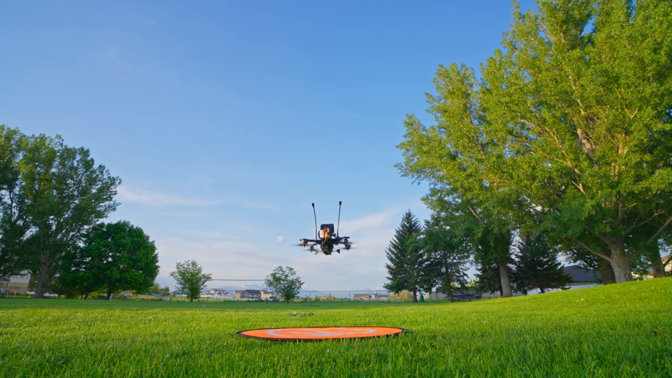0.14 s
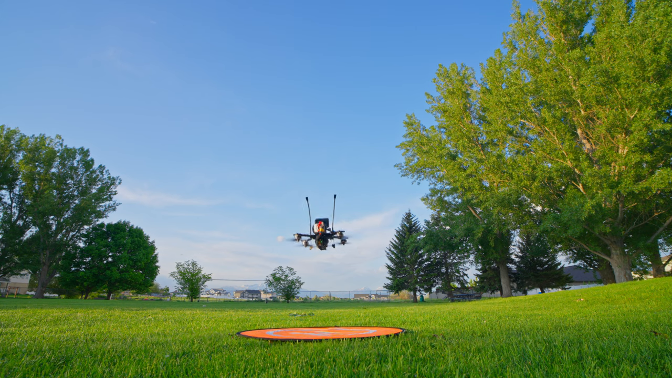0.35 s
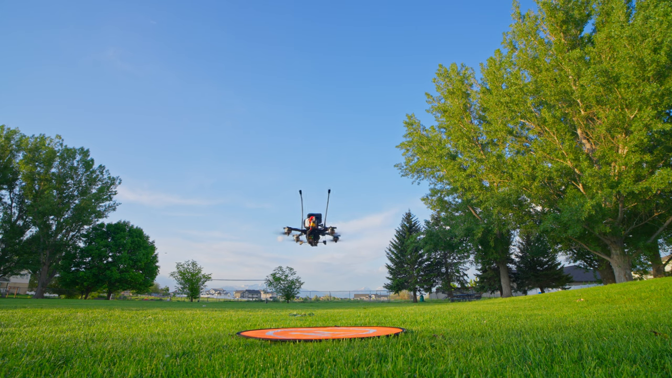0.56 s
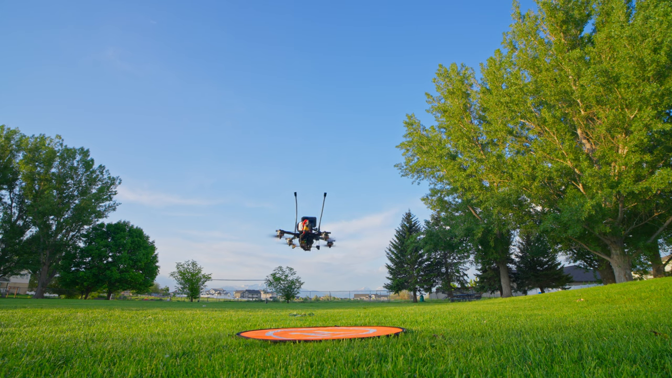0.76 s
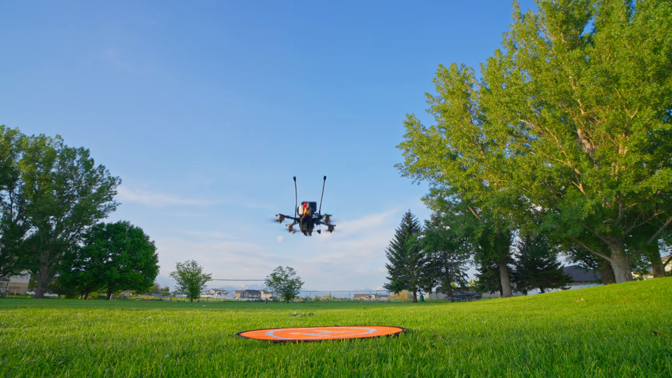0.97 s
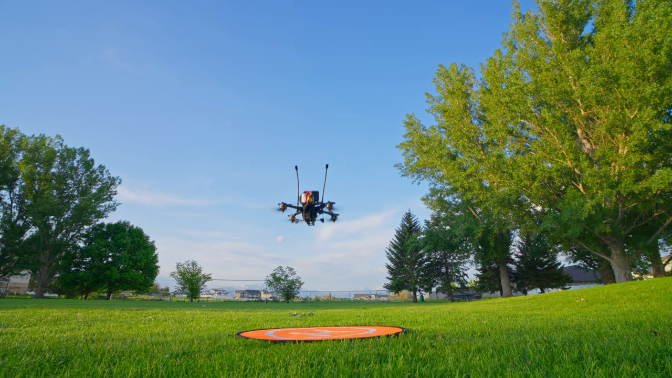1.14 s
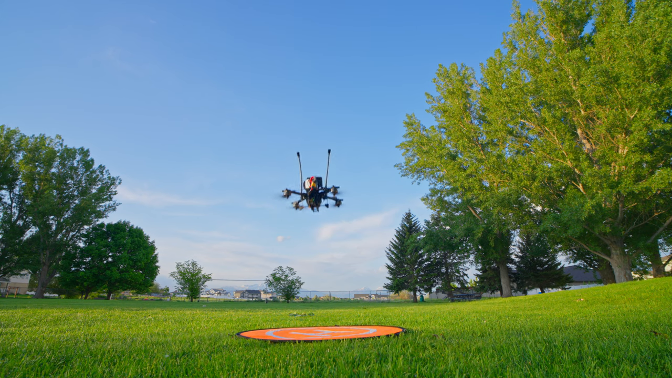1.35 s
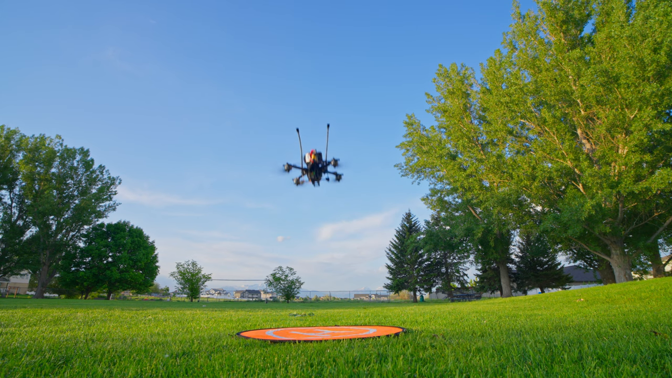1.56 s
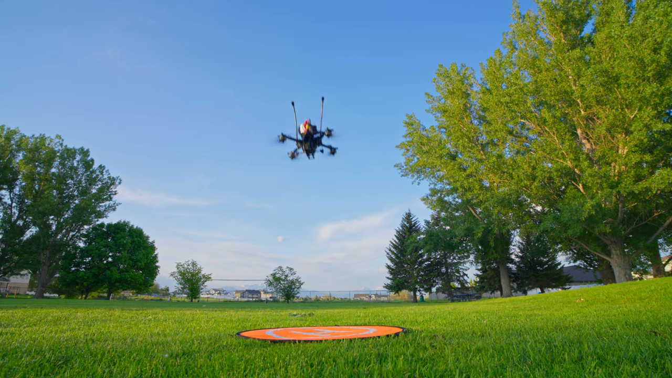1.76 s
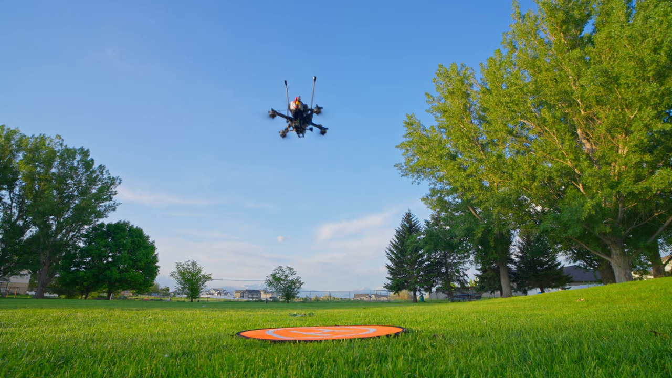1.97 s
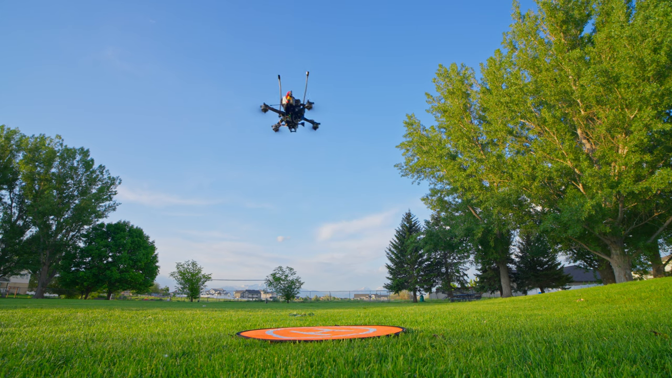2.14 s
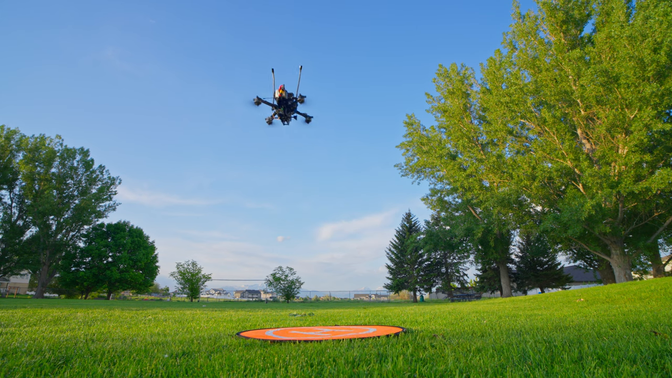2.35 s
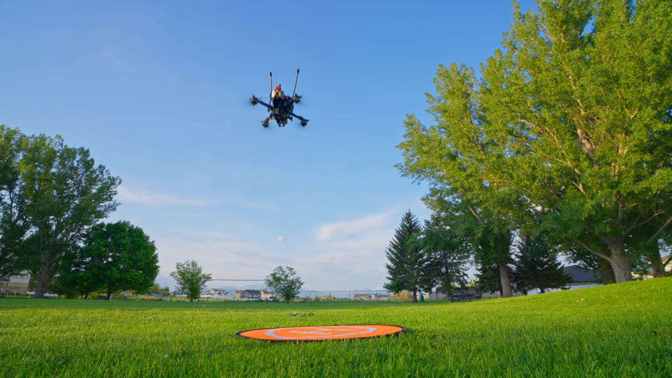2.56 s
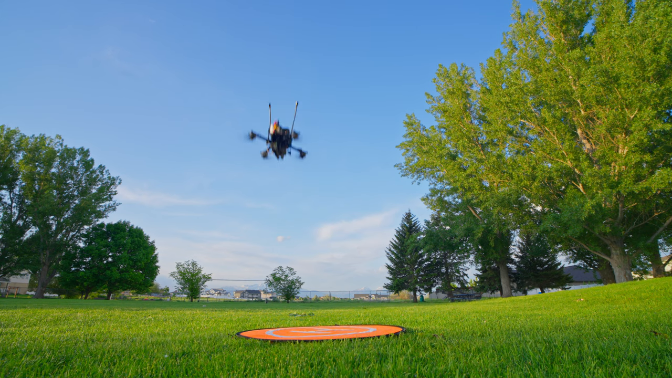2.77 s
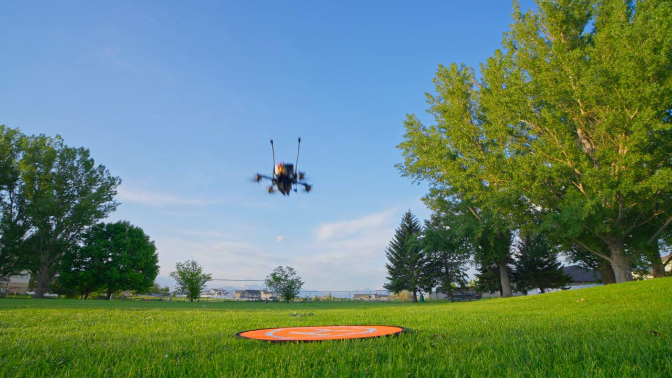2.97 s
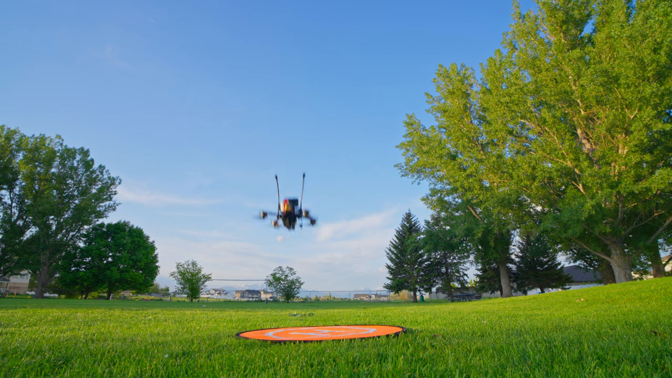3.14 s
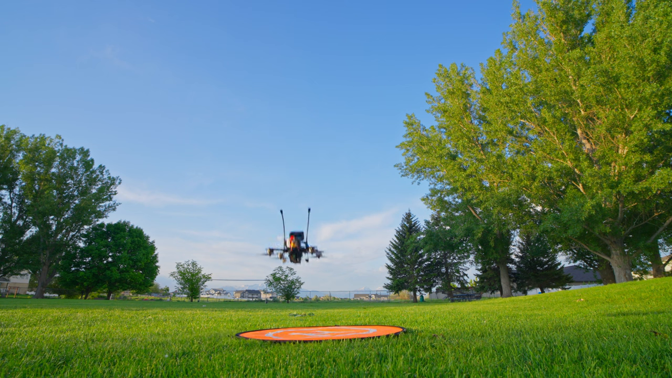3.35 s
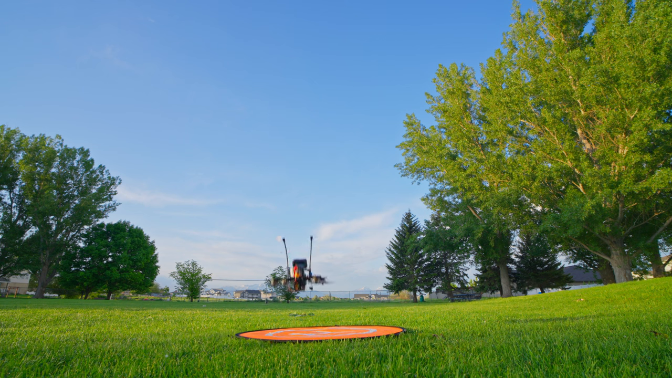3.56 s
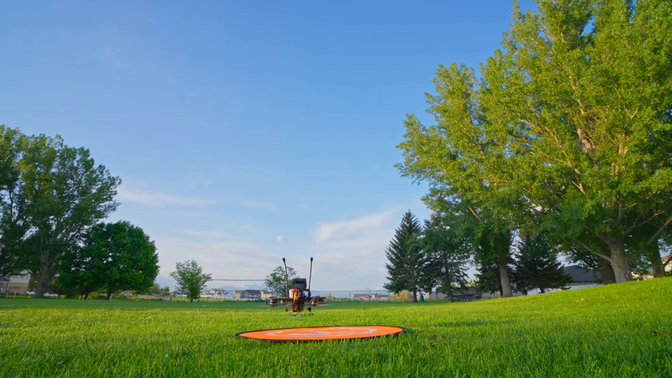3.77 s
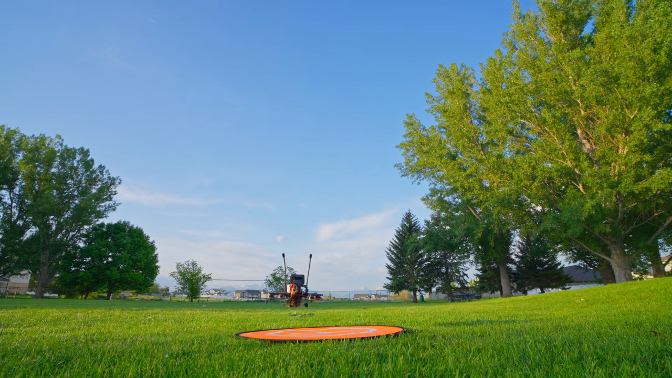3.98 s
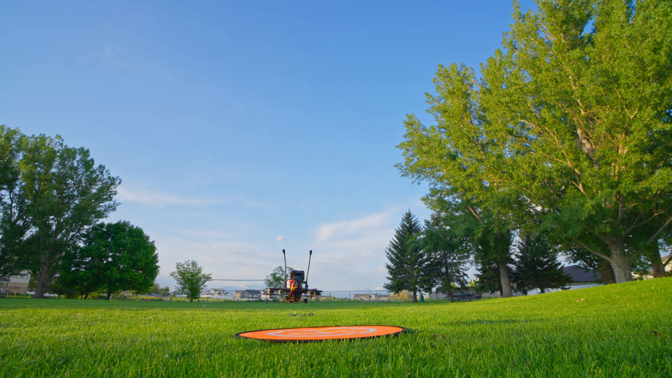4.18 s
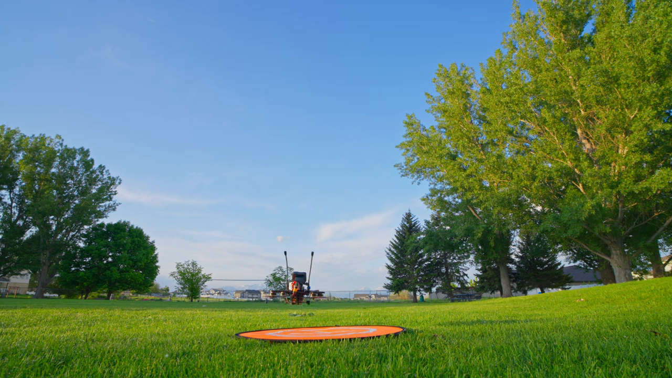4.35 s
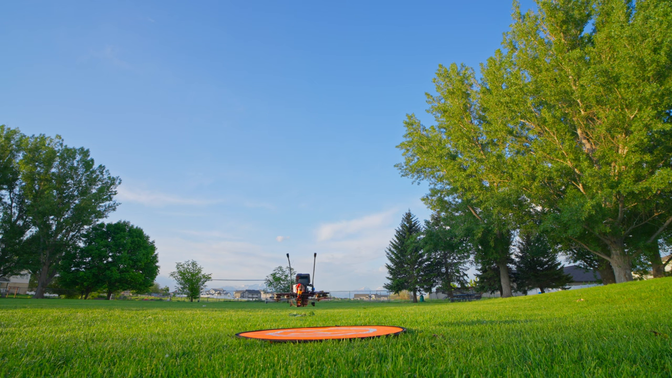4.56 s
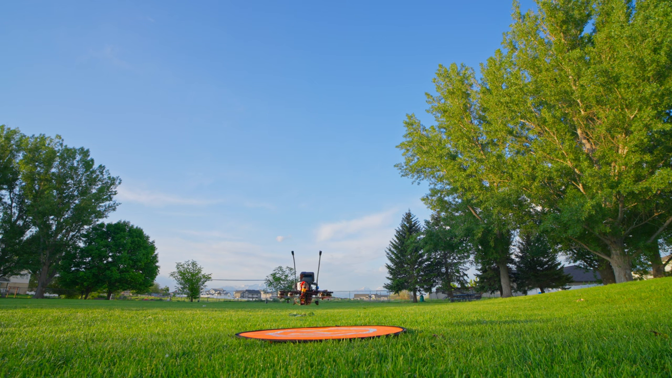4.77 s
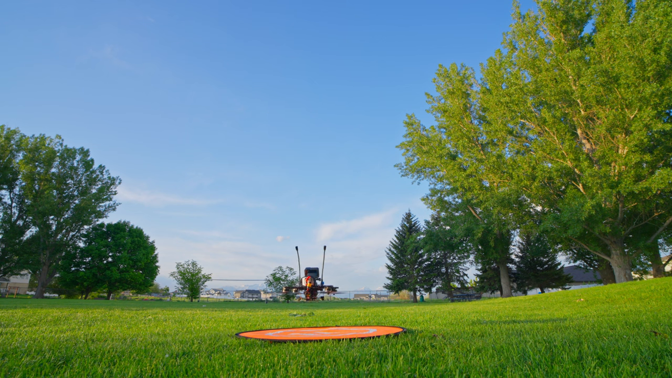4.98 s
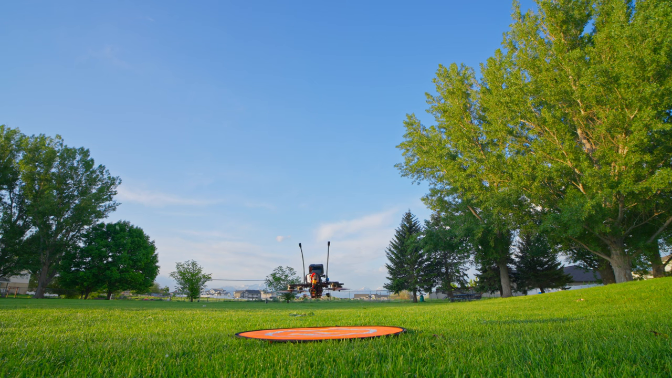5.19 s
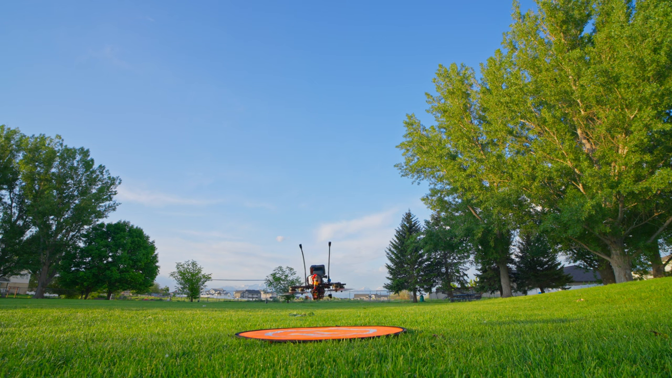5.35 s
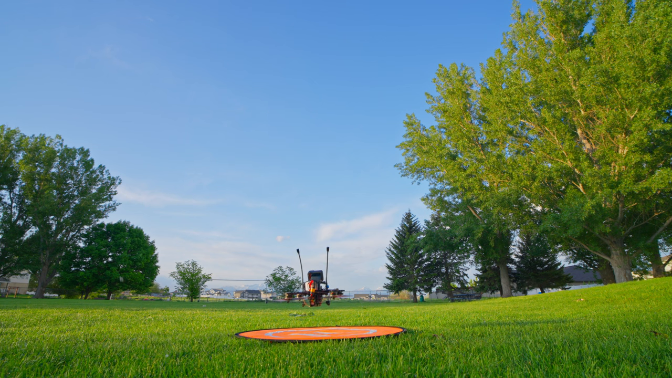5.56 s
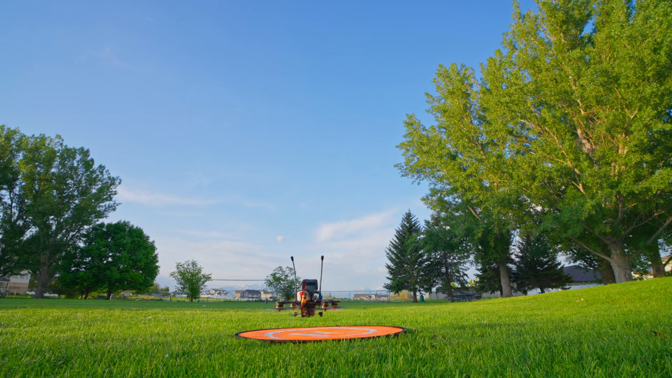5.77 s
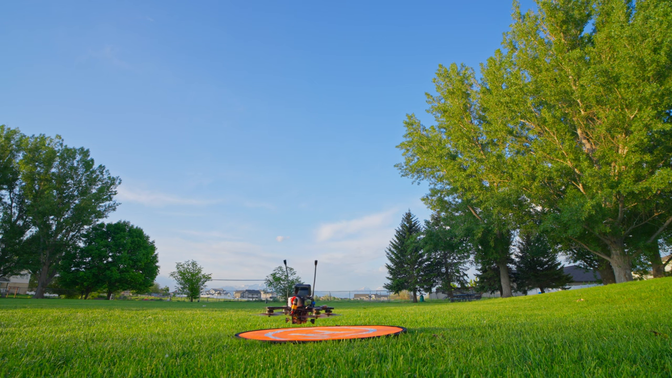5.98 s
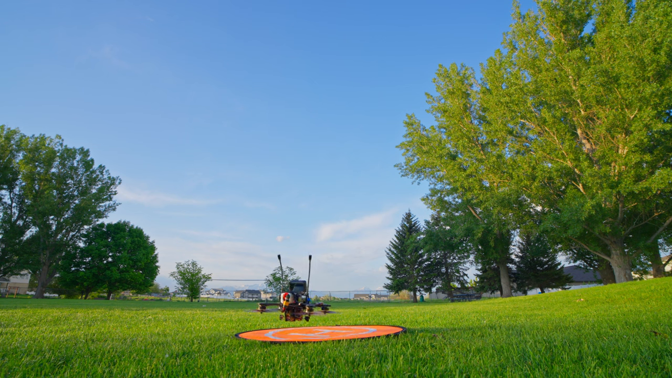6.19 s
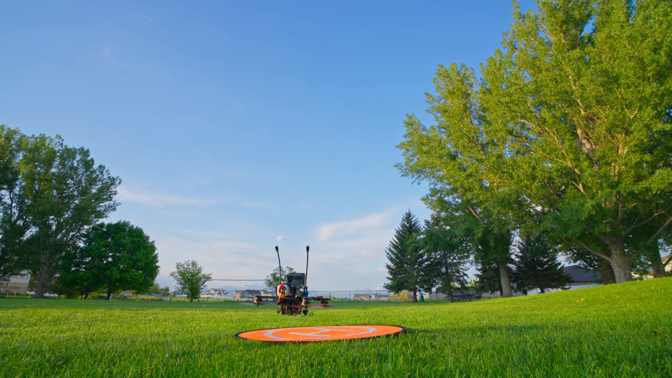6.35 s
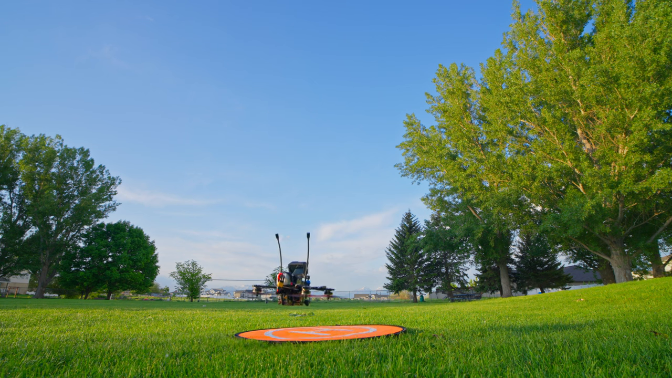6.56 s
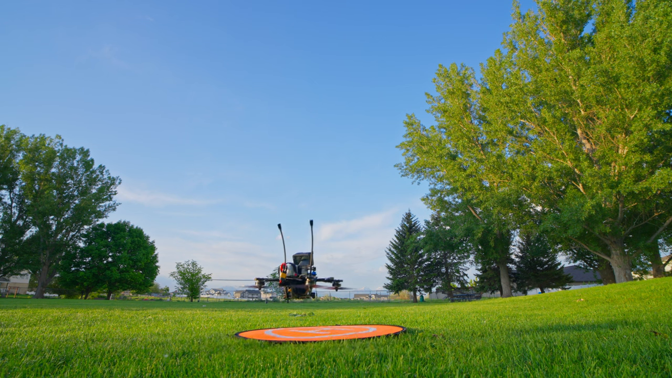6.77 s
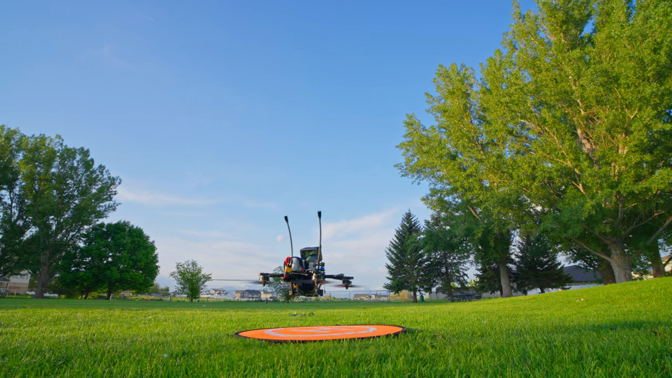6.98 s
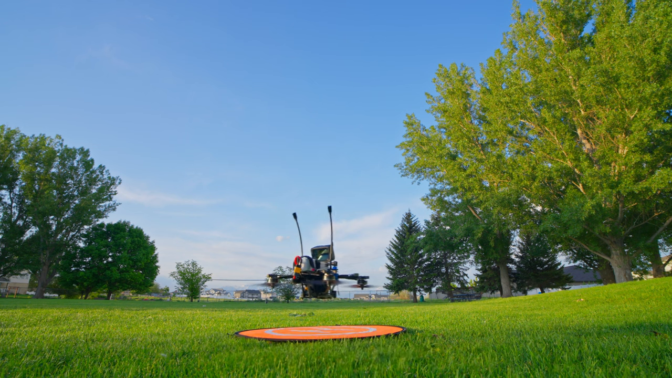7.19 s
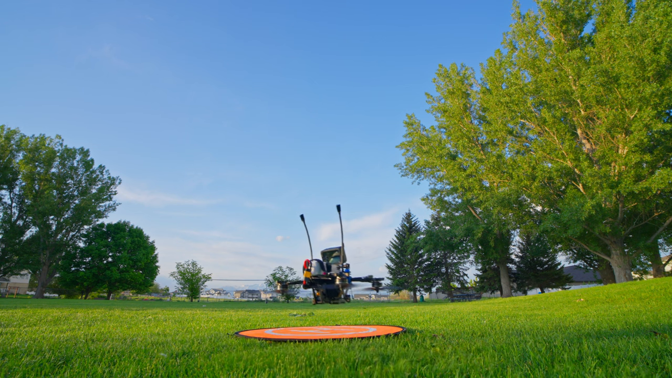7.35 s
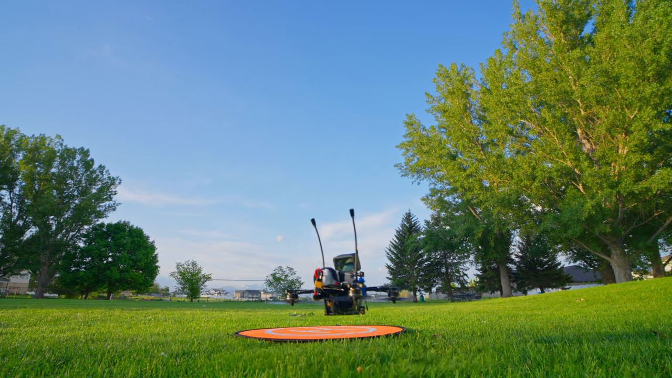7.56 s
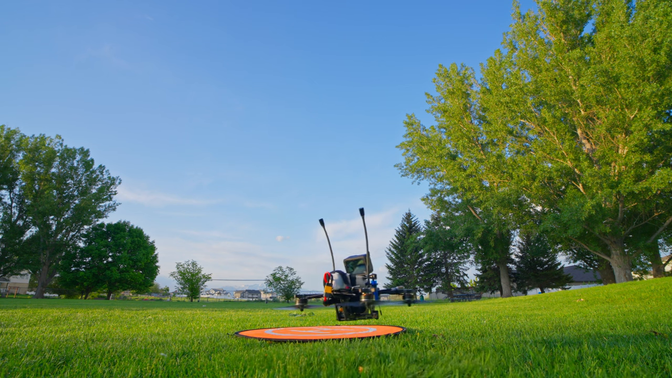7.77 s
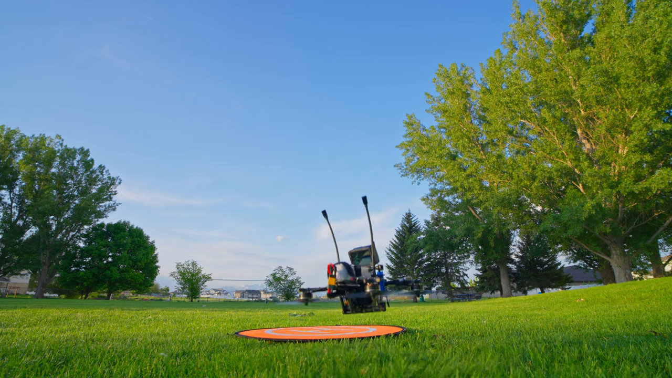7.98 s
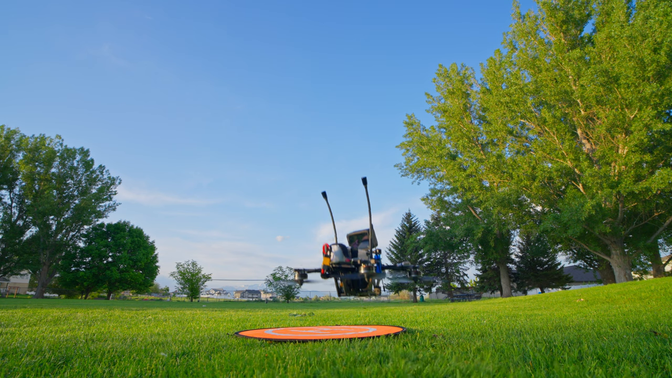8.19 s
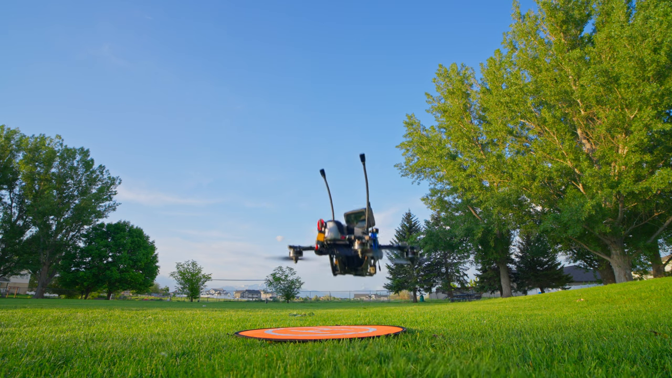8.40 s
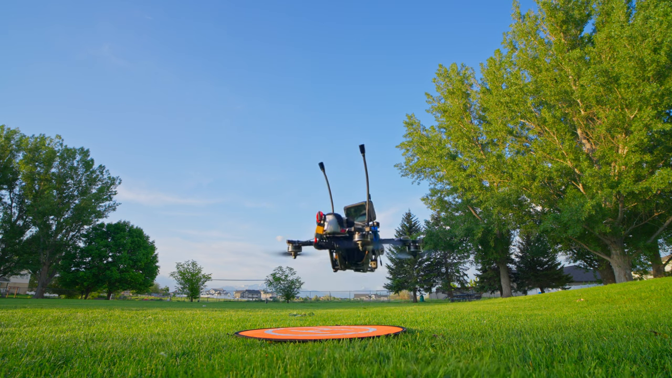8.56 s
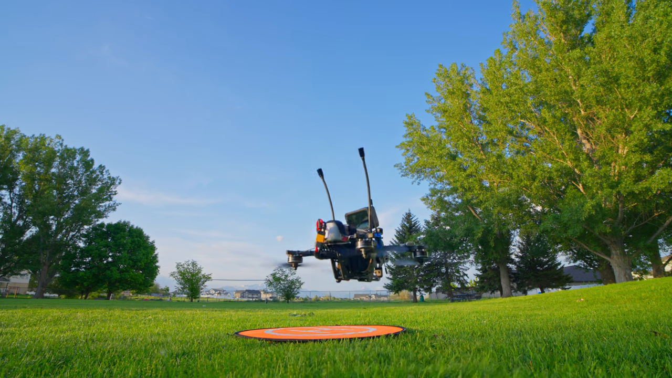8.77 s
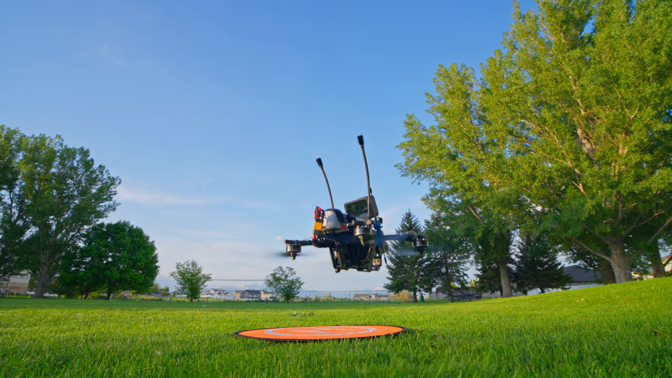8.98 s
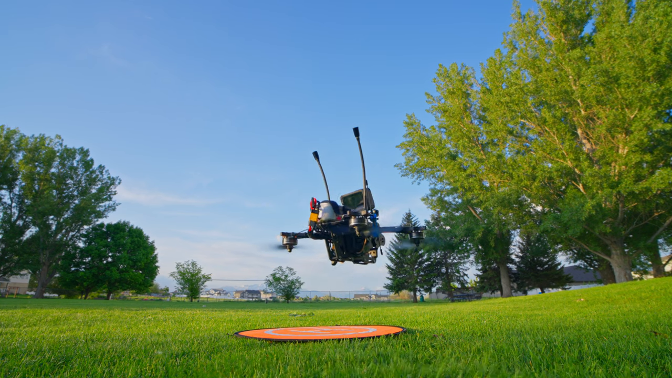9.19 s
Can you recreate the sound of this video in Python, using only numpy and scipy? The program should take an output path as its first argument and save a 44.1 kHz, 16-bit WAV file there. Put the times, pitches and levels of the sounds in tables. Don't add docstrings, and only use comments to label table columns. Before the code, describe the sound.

A small four-rotor drone buzzes and whines over grass, its pitch swooping with quick throttle bursts, then closes in steady and rough above low wind buffets.

```python
import sys
import numpy as np
from scipy import signal
from scipy.io import wavfile

SR = 44100
rng = np.random.default_rng(int(sys.argv[2]) if len(sys.argv) > 2 else 0)


def pcm_store(signal):
    levels = np.round(np.clip(np.atleast_2d(signal), -1, 1) * 32767)
    wavfile.write(sys.argv[1], SR, levels.astype(np.int16).T)


def natural_amplitude(level_db):
    exponent = np.asarray(level_db, float) / 20
    return 10 ** exponent


N = 407035
BLADES = 3

# (multiple of the shaft rate, fast pair level [dB], slow pair level [dB]), against the tip hiss
MAGNETS = [(28, -2, -3), (35, -25, -13)]


def clock():
    return np.arange(0, N + 20, 20) / SR


def fine(x):
    return np.interp(np.arange(N) / SR, clock(), x)


def in_time(rows):
    s, *columns = np.transpose(rows)
    return [np.interp(np.arange(N) / SR, s, column) for column in columns]


def at_hz(points, hz):
    table_hz, table_db = np.transpose(points)
    return np.interp(np.log(hz), np.log(table_hz), table_db)


def rms_one(x):
    return x / np.sqrt(np.mean(x ** 2) + 1e-20)


def slide(start_s, length_s):
    u = np.clip((clock() - start_s) / length_s, 0, 1)
    return u * u * (3 - 2 * u)


def drift(rate):
    r = np.exp(-40 * np.pi * rate / SR)
    white = rng.standard_normal(N // 20 + 2002)
    slow = signal.lfilter([1], [1, -2 * r, r * r], white)[2000:]
    return np.interp(np.arange(N) / 20, np.arange(len(slow)), rms_one(slow))


def bands(low_hz, count):
    edges = low_hz * 2 ** (np.arange(count + 1) / 3)
    white = rng.standard_normal((2, N))
    for k, (low, high) in enumerate(zip(edges, edges[1:])):
        sos = signal.butter(2, [low, min(high, .45 * SR)], "band", fs=SR, output="sos")
        yield np.sqrt(low * high), signal.sosfilt(sos, white[k % 2])


def gusts():
    # (start [s], length [s], level [dB])
    gust_table = [(0.217, 0.2, -42), (.5, 0.18, -44), (.8, 0.11, -54), (1.15, 0.25, -46),
                  (1.497, 0.15, -48.5), (1.864, .07, -46), (2.084, 0.034, -48), (2.543, 0.16, -55.5),
                  (2.869, 0.19, -45), (3.252, 0.22, -47), (3.722, 0.31, -38.5), (4.249, 0.18, -46.5),
                  (4.7, 0.81, -57), (5.623, 0.34, -43), (6.13, 0.085, -48), (6.431, .2, -45),
                  (6.7, .3, -52), (7.2, 1.25, -54), (8.5, .1, -50), (8.883, 0.33, -46.5)]
    rise_db_per_s, fall_db_per_s, calm_db = 141, 86, -63
    t = clock()
    each = []
    for s, length, db in gust_table:
        drop_db = np.maximum(rise_db_per_s * (s - t), fall_db_per_s * (t - s - length))
        each.append(db - np.maximum(0, drop_db))
    return fine(np.maximum(calm_db, np.max(each, axis=0)))


def wind(lumpy_db, side_db):
    # (frequency [Hz], level [dB per Hz])
    buffet = [(20, -4), (40, -3), (80, 5), (160, -2), (300, -12.5), (700, -16), (1500, -27)]

    def rumble():
        noises = bands(19.73, count=18)
        return rms_one(sum(noise * natural_amplitude(at_hz(buffet, hz) + lumpy_db * drift(3.7)) for hz, noise in noises))

    level_db = gusts()
    mid, side = rumble(), rumble()
    return natural_amplitude(level_db + 2.0) * (mid + natural_amplitude(side_db) * side * np.array([[1], [-1]]))


def spin():
    # (start [s], length [s], new blade rate of the fast pair [Hz], of the slow pair [Hz])
    moves = [(0.0, 0.011, 482, 438), (0.131, 0.15, 560.8, 503.4), (0.321, 0.13, 452.3, 397),
             (0.638, 0.12, 587.0, 531.3), (0.802, 0.18, 490.0, 439.7), (1.117, 0.089, 506.0, 455.3),
             (1.281, 0.18, 559.3, 497.0), (1.45, 0.11, 510.6, 452.3), (1.808, 0.18, 446.3, 405),
             (2.069, 0.18, 532.8, 473), (2.293, 0.34, 371.6, 337.7), (2.673, 0.16, 540, 479.5),
             (2.878, 0.19, 445, 380.2), (3.118, 0.13, 576.0, 515.3), (3.257, 0.25, 464, 410.6),
             (3.55, 0.13, 542, 478.4), (3.768, 0.06, 552.0, 524.0), (3.868, 0.2, 464.6, 413),
             (4.254, 0.22, 494, 449), (4.939, 0.23, 470.7, 431.6), (5.745, 0.43, 495.0, 441),
             (6.284, 0.071, 475.7, 437.0), (6.979, 0.19, 486.5, 441.8), (7.268, 0.14, 490.0, 432.4),
             (7.355, 0.36, 498.2, 456), (7.784, 0.19, 500.7, 446.3), (8.017, 0.33, 493.8, 457.7),
             (8.354, 0.13, 458.7, 418.7), (8.628, 0.16, 529, 475), (8.923, 0.135, 490.0, 438.0)]
    rates = np.array(moves)[:, 2:]
    slow = rates[0][:, None]
    for step, (start_s, length_s, *_) in zip(np.diff(rates, axis=0), moves[1:]):
        slow = slow + step[:, None] * slide(start_s, length_s)
    return np.array([fine(pair) for pair in slow])


def whines():
    # (start [s], length [s], level [dB], pitch from [Hz], pitch to [Hz])
    whine_table = [(.17, .05, 7, 4640, 4660), (0.701, .16, 1.5, 4820, 4718), (.94, .07, 2, 4724, 4623),
                   (1.01, .12, -5, 4710, 4707), (1.151, .16, 6.5, 4636, 4794),
                   (1.561, .3, -1.5, 4740, 4680), (3.172, .08, 3, 4710, 4700), (3.392, .05, 1, 4690, 4670),
                   (3.7, .16, 4.5, 4193, 4180), (3.58, .09, 10, 4474, 4830), (4.471, .17, 8, 4680, 4645),
                   (4.702, .1, 3, 4715, 4630), (4.82, .15, 7.5, 4686, 4670), (5.861, .16, 4.5, 4640, 4644),
                   (6.02, .29, 1.5, 4667, 4640), (7.562, .29, 8, 4744, 4641), (7.85, .18, 7, 4675, 4720),
                   (8.03, .36, 6.5, 4702, 4613), (8.69, .07, 9, 4593, 4816), (8.969, .08, -13, 4697, 4660)]
    edge_s = .045
    held = hz = gain = 0
    for s, length, db, from_hz, to_hz in whine_table:
        on = slide(s - edge_s / 2, edge_s) - slide(s + length - edge_s / 2, edge_s)
        held = held + on
        gain = gain + on * natural_amplitude(db)
        pitch_hz = from_hz + (to_hz - from_hz) * slide(s, length)
        hz = hz + on * pitch_hz * BLADES / MAGNETS[0][0]
    held = fine(held)
    hz = fine(hz) * (1 + .007 * drift(7.0))
    gain = fine(gain) * natural_amplitude(2.8 * np.tanh(drift(14.0)))
    return np.minimum(held, 1), hz / np.maximum(held, 1e-9), gain + natural_amplitude(-14)


def level_dips():
    # (deepest from [s], hold [s], depth [dB])
    ducks = [(0.38, .19, -4.5), (0.65, .01, -7.5), (1.327, 0.05, -1.5), (1.616, .2, 0), (2.2, .2, -0.5),
             (3.05, 0.066, -1), (3.41, 0.16, -1), (3.878, 0.026, -2.5), (4.061, 0.021, -9),
             (4.152, .15, -3.5), (5.599, .15, 0), (5.931, 0.055, -2), (8.5, 0.14, 0), (8.939, 0.018, -3.5),
             (9.133, .02, -3.5)]
    in_s, out_s = 0.057, 0.03
    t = clock()
    duck = 0
    for s, hold, db in ducks:
        away = np.maximum((s - t) / in_s, (t - s - hold) / out_s)
        duck = duck + db * np.exp(-np.maximum(0, away))
    return fine(duck)


def flight(rates_hz):
    # (time [s], loudness at hover speed [dB], steepness above the microphone [0-1],
    # skimming the grass [0-1])
    path = [(0, -28, 0.24, 0.07), (.45, -26, 0.32, 0), (.85, -28.5, 0.12, 0.12), (1.16, -27.5, 0.34, 0.22),
            (1.45, -25, 0.3, 0.18), (1.9, -22, 0.76, 0.12), (2.25, -24, 1.0, 0.28), (2.62, -22.5, 1, 0.1),
            (2.9, -25, 0.79, 0.17), (3.25, -27.5, 0.24, 0.03), (3.55, -26, 0.2, .5),
            (3.8, -25.5, 0.07, 0.55), (4.15, -27.5, 0.16, 0.95), (4.9, -27.5, 0.05, 1), (6.3, -23, 0, 0.87),
            (7.0, -23.5, 0, 0.25), (8.1, -22.5, 0.04, 0.21), (9.23, -22.5, 0.07, 0.18)]
    # (time [s], nearness [0-1])
    approach = [
        (0, 0.4),
        (.7, 0.75),
        (1.3, 0.46),
        (2.4, 0.3),
        (3.4, 0.33),
        (4.6, 0.4),
        (5.6, 0.34),
        (6.1, 0.82),
        (9.23, 0.92),
    ]
    level, steep, skim = in_time(path)
    near, = in_time(approach)
    fast, slow = np.log2(rates_hz / 490)
    turned = fine(slide(3.3, 0.36))
    duck = level_dips()
    spared = -0.5 * duck
    hiss = level + duck + 5 * fast
    tones = [-8.5 + spared - 23.5 * steep + 10.5 * fast,
             -12.5 + spared - 17 * steep + 5 * slow,
             -7 - 3 * steep - 10 * skim + 6 * fast,
             -10.5 + 0.5 * steep - 5 * skim + 6 * slow]
    slap = hiss - 10.5 + np.minimum(steep, 1) ** 3 - 9 * skim - 1.5 * near * turned + 4.5 * fast
    rough = np.clip(.42 - .16 * steep + .3 * np.maximum(skim, near * turned), .2, 1)
    roar = -29 + 2 * skim + 16.5 * near - 2 * steep - duck
    swish = 3 * near - 2 * steep + 1.5 * fast
    sheen = -2 * skim - 4 * turned
    return hiss, [hiss + db for db in tones], slap, rough, [roar, swish, sheen]


def rotors(rates_hz, rough, held, held_hz, trim):
    fast_hz, slow_hz = rates_hz
    second = 1.005 + .01 * drift(2.0)
    apart = .008 * drift(3.0)
    speeds = [fast_hz, fast_hz * second, slow_hz * (1 + apart), slow_hz * (1 - apart)]
    fast_holds = np.abs(fast_hz - held_hz) < np.abs(slow_hz - held_hz)
    speeds[1] = speeds[1] + held * fast_holds * (held_hz - speeds[1])
    speeds[3] = speeds[3] + held * ~fast_holds * (held_hz - speeds[3])
    speeds = [hz * (1 + trim * rough * drift(9.84)) for hz in speeds]
    return 2 * np.pi * np.cumsum(speeds, axis=1) / SR + rng.uniform(0, 99, (4, 1))


def air(phases, roar_db, swish_db, sheen_db, chop, patchy_db):
    # (frequency [Hz], level [dB per Hz])
    hiss = [(200, -24.5), (400, -20.5), (760, -16.5), (1150, -13), (1600, -8.5), (2800, -0.5), (4700, 1),
            (6200, -4.5), (9000, -3), (11500, -10.5), (14000, -7), (16500, -20)]
    passes = 1 + chop * np.sum(np.cos(phases), axis=0)
    gust = drift(2.0) + drift(40.0)
    out = tip = 0
    roar_db, swish_db, sheen_db = [db - db.mean() for db in (roar_db, swish_db, sheen_db)]
    colours_db = [roar_db, swish_db, 0, sheen_db]
    for hz, noise in bands(206.1, count=19):
        centres = np.log([800, 3400, 7000, 11000])
        shares = [np.interp(np.log(hz), centres, row) for row in np.eye(4)]
        level_db = at_hz(hiss, hz) + sum(share * db for share, db in zip(shares, colours_db))
        noise = noise * natural_amplitude(level_db + patchy_db * (gust + 0.81 * drift(6.2)))
        out = out + noise * (shares[0] + (1 - shares[0]) * passes)
        tip = tip + noise * (5500 < hz < 9500)
    return out / np.sqrt(np.mean(tip ** 2))


def motors(phases, whine, rattle_db):
    # (frequency [Hz], width [Hz], level [dB])
    bells = [
        (4700, 150, 0),
        (5290, 210, -2),
    ]
    pull = 0
    for k, phase in enumerate(phases):
        for order, *levels_db in MAGNETS:
            level_db = levels_db[k // 2] + 2.2 * drift(30.0)
            pull = pull + natural_amplitude(level_db) * np.sin(order * phase / BLADES)
    pull = whine * pull + natural_amplitude(rattle_db) * rng.standard_normal(N)
    out = 0
    for hz, width_hz, db in bells:
        r = np.exp(-np.pi * width_hz / SR)
        bell = [(1 - r * r) / 2, 0, (r * r - 1) / 2, 1, -2 * r * np.cos(2 * np.pi * hz / SR), r * r]
        out = out + natural_amplitude(db) * signal.sosfilt([bell, bell], pull)
    return out


def propellers(phases, levels_db, slap_db, rough, shaft_db, flutter_db):
    # (multiple of the blade rate, level [dB])
    overtones = [(2, -3.5), (3, 1), (4, 1)]
    # (multiple of the blade rate, level [dB])
    slap = [(5, 0), (8, -1), (11, -5), (14, -13)]
    # (time [s], pitch [Hz], lift [dB])
    echo = [(0, 1480, 1), (.27, 1750, 6), (.44, 1850, 3), (.63, 1850, 4), (.8, 1220, 1), (1.5, 1089, 7.5),
            (1.9, 1009, 5), (2.05, 2690, 8), (2.35, 2700, 0), (2.65, 2752, 12), (2.88, 2135, 2),
            (3.1, 1796, 12.5), (3.3, 1708, -0.5), (7.0, 1401, -2.5), (8.0, 1941, 3), (8.5, 1301, 1),
            (8.85, 1493, 5), (9.23, 1484, 6.5)]
    echo_hz, echo_db = in_time(echo)
    echo_width_octaves = 0.11
    out = np.zeros(N)
    for k, phase in enumerate(phases):
        pair = k // 2
        base_db, over_db = levels_db[pair], levels_db[2 + pair]
        lead = natural_amplitude(-6.0 * (k % 2))
        octaves_off = np.log2(np.gradient(phase) * SR / (2 * np.pi * echo_hz))
        tone = np.sin(phase) + natural_amplitude(shaft_db) * np.sin(phase / BLADES)
        out += lead * natural_amplitude(base_db - 0.5 + 2.0 * drift(18.0)) * tone
        for m in range(2, 15):
            if m < 5:
                db = over_db + at_hz(overtones, m) - 5 * pair * (m == 4)
            else:
                db = slap_db + 3 - 11 * pair + at_hz(slap, m)
            shaky = 1.6 * np.tanh(drift(35.0) / 1.4)
            sway = (rough + .15) * np.sqrt(m) * drift(30.0)
            db = db + 2.0 * drift(4.0) + flutter_db * shaky
            db = db + echo_db * np.exp(-((octaves_off + np.log2(m)) / echo_width_octaves) ** 2)
            out += lead * natural_amplitude(db) * np.sin(m * phase + .45 * sway)
    return out


def scene():
    rates_hz = spin()
    held, held_hz, whine = whines()
    hiss_db, tones_db, slap_db, rough, colours_db = flight(rates_hz)
    phases = rotors(rates_hz, rough, held, held_hz, trim=.003)
    drone = propellers(phases, tones_db, slap_db, rough, shaft_db=-17, flutter_db=2.8)
    drone = drone + natural_amplitude(hiss_db) * motors(phases, whine, rattle_db=-2)
    drone = drone + natural_amplitude(hiss_db) * air(phases, *colours_db, chop=.07, patchy_db=0.72)
    return drone + wind(lumpy_db=2.5, side_db=-25)


def band_limit(x):
    return signal.sosfilt(signal.butter(12, 16850, fs=SR, output="sos"), x)


def record(dry):
    cut = signal.sosfilt(signal.cheby2(14, 80, 16200, fs=SR, output="sos"), dry)
    return band_limit(cut)


dry = scene()
out = record(dry)
pcm_store(out)
```